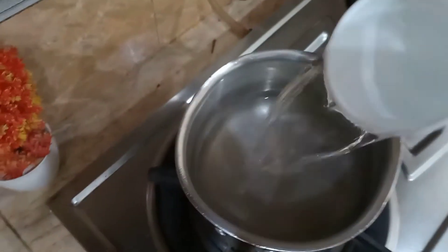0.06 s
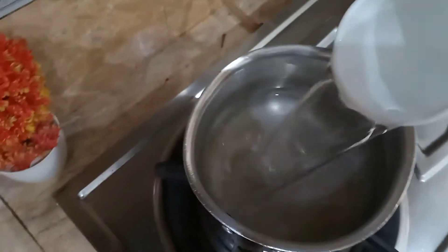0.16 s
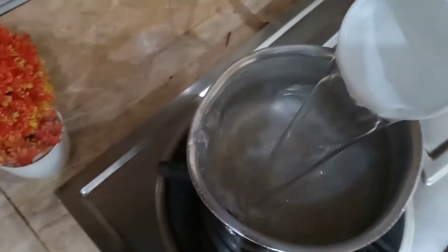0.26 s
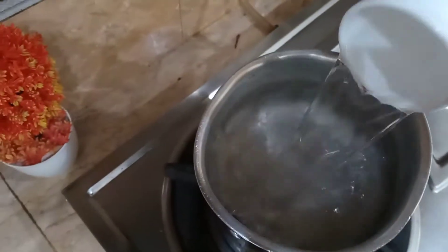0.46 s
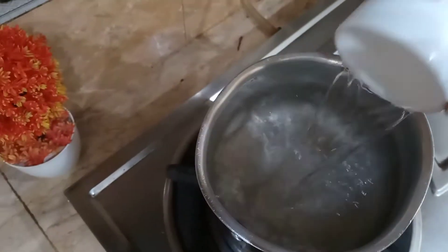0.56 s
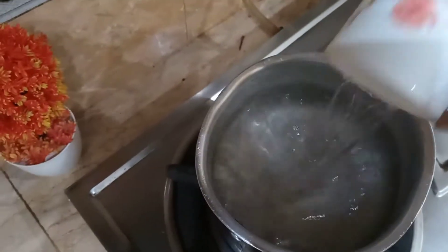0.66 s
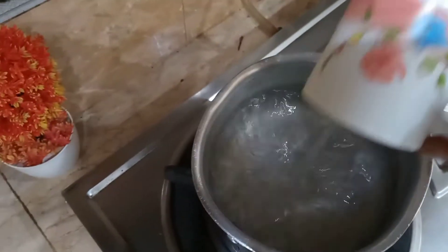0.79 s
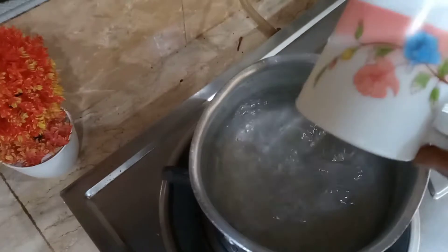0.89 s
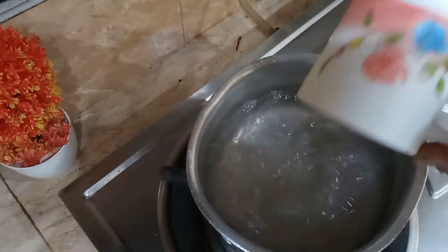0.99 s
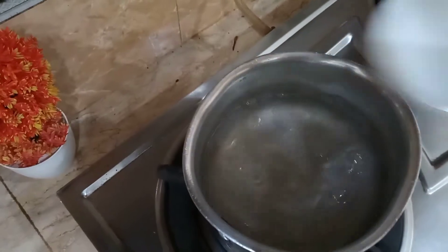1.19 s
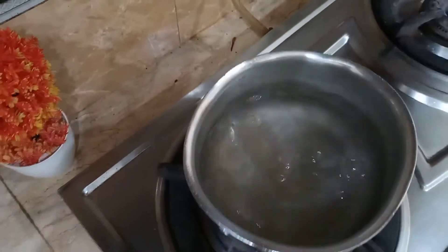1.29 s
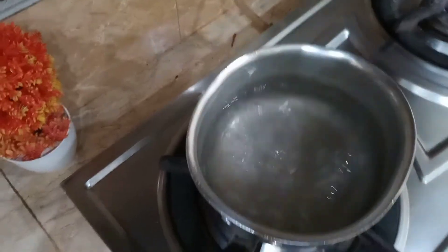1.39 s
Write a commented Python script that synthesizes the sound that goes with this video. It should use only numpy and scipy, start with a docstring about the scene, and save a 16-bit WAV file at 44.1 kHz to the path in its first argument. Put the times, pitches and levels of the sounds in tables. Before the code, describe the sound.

In a quiet kitchen, a quick, close pour of water hits a metal pan with bright spatter and gurgling bubbles. The steel hums softly underneath, and the pour trails off into light ticking drips.

```python
"""A faint low thump, then ticking drops: a cup of water is poured into a steel saucepan.
Drops strike the steel and the water, trapped air rings as bubbles large and small, and the shaken pan
hums along. The stream thins out to last drops and a fine fizz. Short echoes come off the pan's walls
and the counter, and behind it all lies the low rumble of a quiet kitchen."""
import sys
import numpy as np
from scipy import signal
from scipy.fft import rfft, irfft
from scipy.io import wavfile

SR = 44100
rng = np.random.default_rng(int(sys.argv[2]) if len(sys.argv) > 2 else 0)


def master_out(mix):
    """Clip the mix to full scale and print it as 16-bit PCM to the path in sys.argv[1]."""
    frames = np.transpose(np.atleast_2d(mix))
    ceiling = np.clip(frames, -1, 1)
    pcm = np.round(ceiling * 32767).astype(np.int16)
    wavfile.write(sys.argv[1], SR, pcm)


N = 63945

# Levels in the tables are relative: the functions add their own gains.
# The stream: t/s, then level/dB of large bubbles, gurgle, middle bubbles, small bubbles, spray, mist
STREAM_LEVELS = [(0.14, -69.5, -70, -85, -73, -83, -80), (0.208, -48, -80, -33, -41.5, -33.5, -38),
                 (0.248, -36, -51, -35.5, -32, -37, -36.5), (0.26, -31.5, -67, -36, -45, -31, -32),
                 (0.284, -36, -53, -36.5, -36, -30.5, -32.5), (0.326, -34.5, -52.5, -36, -43.5, -39.5, -43),
                 (0.602, -39.5, -56.5, -33.5, -35.5, -35, -41), (0.624, -38, -56.5, -35, -40.5, -42, -44),
                 (0.632, -35, -52.5, -26, -36.5, -38, -42), (0.66, -41, -58.5, -38, -35, -35, -37.5),
                 (0.712, -26.5, -45, -32.5, -65, -37.5, -39.5),
                 (0.742, -38, -50.5, -40.5, -43.5, -44.5, -47), (0.782, -32.5, -48, -41.5, -62, -47, -49),
                 (0.792, -44, -48, -34, -40.5, -41, -40.5), (0.818, -37.5, -44.5, -43, -59.5, -48.5, -51),
                 (0.946, -43, -57, -49.5, -58.5, -45, -49.5), (0.974, -46, -56, -52.5, -76.5, -67.5, -92.5),
                 (0.982, -49.5, -62, -59, -63, -52.5, -50), (1.014, -40.5, -58.5, -51.5, -62, -60, -54),
                 (1.034, -49, -62.5, -58, -62.5, -58.5, -62.5), (1.242, -67, -97, -73, -62.5, -62.5, -66),
                 (1.45, -100.5, -77, -94, -72.5, -61.5, -66.5)]
# Swarms of tiny rings: rate/(1/s), lowest f/Hz, highest f/Hz, ring length/cycles, size spread/dB,
# level/dB of the noise beneath the clicks, overall level/dB
GURGLE_SWARM = (306, 283.5, 463, 9, 2.5, 3, -2.5)
LARGE_SWARM = (507, 645.5, 2067.5, 15, 1.5, -2, -5.5)
MIDDLE_SWARM = (504.5, 2007, 3918, 6.5, -0.5, 0, -4.5)
SMALL_SWARM = (905.5, 3801, 6286, 25, 5, -7, -5)
SPRAY_SWARM = (1502.5, 6206, 9193, 51, 2, 1.5, -9)
MIST_SWARM = (2010.5, 9008.5, 15995, 17.5, 2.5, 5, -6)
# Loud single bubbles: t/s, level/dB, starting f/Hz, t60/s (the time to fade by 60 dB)
SINGLE_BUBBLES = [(0.253, -19, 1027, 0.047), (0.257, -18.5, 762, 0.026), (0.271, -30, 543, 0.04),
                  (0.278, -27, 540, 0.011), (0.316, -24.5, 1057, 0.053), (0.321, -20.5, 1095, 0.024),
                  (0.389, -33.5, 1680, 0.055), (0.447, -19.5, 963, 0.02), (0.452, -23.5, 1176, 0.023),
                  (0.519, -30.5, 753, 0.051), (0.555, -27, 1490, 0.036), (0.556, -34, 1538, 0.074),
                  (0.628, -29.5, 915, 0.2), (0.642, -25.5, 1560, 0.039), (0.678, -25, 980, 0.024),
                  (0.6927, -15.5, 1750, 0.016), (0.704, -19.5, 1830, 0.038), (0.728, -32.5, 1784, 0.061),
                  (0.768, -23.5, 1095, 0.033), (0.78, -23.5, 1108, 0.078), (0.791, -20, 1092, 0.029),
                  (0.842, -28.5, 1750, 0.03), (1.007, -26, 1676, 0.05), (1.077, -39.5, 1710, 0.03),
                  (0.7053, -24, 1150, 0.03), (0.78, -20, 1360, 0.03), (0.267, -25.5, 660, 0.046),
                  (0.45, -29, 666, 0.048), (0.555, -32, 790, 0.061), (0.1615, -31.5, 4400, 0.028),
                  (0.1674, -32.5, 5820, 0.017), (0.1605, -47, 8500, 0.017), (0.186, -29, 2730, 0.013),
                  (0.2048, -21.5, 3620, 0.023), (0.2172, -25.5, 3206, 0.08), (0.2404, -18, 5470, 0.0085),
                  (0.2595, -23, 3710, 0.067), (0.2674, -30, 3380, 0.036), (0.2734, -16, 3340, 0.015),
                  (0.277, -25, 3970, 0.023), (0.3093, -18.5, 4140, 0.02), (0.3154, -18, 2440, 0.01),
                  (0.3427, -19.5, 4940, 0.015), (0.3658, -20.5, 3110, 0.011), (0.392, -20.5, 3620, 0.0099),
                  (0.403, -23, 3150, 0.02), (0.4339, -26, 3680, 0.014), (0.4524, -27, 3540, 0.019),
                  (0.4903, -21, 3420, 0.021), (0.5188, -18, 3170, 0.017), (0.5686, -20, 3120, 0.027),
                  (0.5838, -28, 3360, 0.086), (0.631, -21.5, 3430, 0.019), (0.631, -13, 2590, 0.021),
                  (0.6415, -19, 3000, 0.032), (0.6628, -24, 4120, 0.022), (0.6926, -13.5, 3100, 0.015),
                  (0.7347, -26, 2590, 0.019), (0.7563, -28, 2580, 0.027), (0.7901, -25.5, 4410, 0.035),
                  (0.8394, -28, 2616, 0.044), (1.2037, -42, 3540, 0.015), (1.2085, -40.5, 4050, 0.02),
                  (1.2451, -47, 5520, 0.024), (1.343, -49, 4450, 0.014)]
# Drops striking: t/s, level/dB, extra treble level/dB, treble f/Hz, length/s
DROP_HITS = [(0.1594, -51, -9, 11100, 0.0043), (0.1654, -38.5, -13, 12700, 0.0038),
             (0.185, -35.5, -8, 9200, 0.0077), (0.208, -17, -10.5, 10600, 0.0042),
             (0.2154, -23, -33, 12000, 0.0075), (0.2264, -21, -19, 13000, 0.0022),
             (0.2625, -23.5, -4, 14000, 0.0017), (0.2895, -20.5, -11, 10000, 0.001),
             (0.299, -32, -4, 13000, 0.0014), (0.334, -28, -13, 15300, 0.0026),
             (0.355, -30.5, -7, 9500, 0.001), (0.392, -42, 0, 15200, 0.0018),
             (0.44, -31, -15, 11000, 0.002), (0.4555, -26.5, -10, 13900, 0.0034),
             (0.486, -27, -23, 9500, 0.0012), (0.494, -33.5, -5.5, 11500, 0.0011),
             (0.506, -35.5, -20, 9500, 0.002), (0.541, -39, 0.5, 15000, 0.0038),
             (0.5599, -34.5, -10.5, 12000, 0.0036), (0.629, -24.5, -7.5, 13000, 0.0009),
             (0.677, -30.5, -9.5, 12000, 0.00088), (0.703, -28, -13.5, 11000, 0.0018),
             (0.719, -34, -5.5, 14000, 0.0012), (0.808, -27, -10, 15000, 0.0012),
             (0.8392, -30, -5, 14500, 0.00091), (0.907, -33.5, -16, 10000, 0.0014),
             (0.933, -32, -20, 9500, 0.00055), (0.939, -39, -7, 9300, 0.00092),
             (0.986, -38, 2, 11500, 0.00087), (1.145, -51, 1.5, 11600, 0.00084),
             (1.1907, -28.5, -32.5, 9000, 0.00067), (1.2028, -33, -4.5, 10700, 0.001),
             (1.233, -46.5, -18, 9000, 0.0017), (1.247, -40, -24, 11000, 0.0022)]
# The pan's three tones: f/Hz, width/Hz, late climb/Hz
PAN_TONES = [(240, 11, 0), (549.7, 28.4, 50.5), (1679, 140, 2.5)]
# How strongly the water drives them: t/s, then level/dB of the low, middle and high tone
PAN_TONE_LEVELS = [(.16, -89, -76, -104), (0.204, -55, -88, -44), (0.269, -55, -34, -50),
                   (.36, -67, -51.5, -50), (.5, -57, -64, -49), (.65, -66.5, -66.5, -53),
                   (.73, -72.5, -48.5, -45), (.83, -58, -46.5, -51), (.96, -73, -54.5, -57),
                   (1.082, -70.5, -67, -60), (1.17, -100, -66.5, -65.5), (1.21, -87, -102, -66),
                   (1.365, -93, -88, -77.5), (1.385, -84, -92, -100)]
# The kitchen's steady noise: f/Hz, level/dB
ROOM_SPECTRUM = [(20, -28), (70, 3.5), (200, -4.5), (600, -12), (1500, -12), (4000, -21), (6500, -21.5),
                 (7600, -21), (16000, -22)]

BRIGHT_HZ, BRIGHT_WIDTH_HZ = 7670, 720   # a bright resonance shared by spray and drops
SPATTER_PER_S, SPATTER_FADE_S, SPATTER_DB = 240, 0.0031, 2
BUBBLE_DB, ONSET_S, RISE = -2.5, 0.00038, 0.138   # the pitch rises by this share over one t60
WOBBLE_SPEED, WOBBLE_DEPTH = 0.092, 0.44   # a bubble's level wobbles; speed is a share of its pitch
TICK_DB, TICK_TAIL_S, TICK_TAIL_DB = 7.5, 0.0084, -11.5
TREBLE_WIDTH_HZ, TREBLE_DB = 5100, 7.5
PAN_EVENNESS = 0.45   # 0 wavers like noise, 1 is nearly steady
SETTLE_S = (0.98, 1.3)   # the pan's tones climb between these times as the water settles
ECHO_T60_S, ECHO_DB, ECHO_CUT_HZ = 0.44, -11, 12600
ROOM_DB, WHINE_HZ, WHINE_WIDTH_HZ, WHINE_DB = -74, 5280, 100, -85.5
THUMP_S, THUMP_HZ, THUMP_T60_S, THUMP_DB = 0.0032, 76, 0.058, -56
WATER_LOW_CUT_HZ, TOP_CUT_HZ = 130, 16400


def stream():
    """Pouring water traps air and throws spray: six swarms, deep to high, swell and fade with the flow."""
    large, gurgle, middle, small, spray, mist = gain_curves(STREAM_LEVELS)
    fizz = swarm(*SPRAY_SWARM)
    fizz = fizz + amp(1.5) * resonance(fizz, BRIGHT_HZ, BRIGHT_WIDTH_HZ)
    bubbling = gurgle * swarm(*GURGLE_SWARM) + large * swarm(*LARGE_SWARM)
    bubbling += middle * swarm(*MIDDLE_SWARM) + small * swarm(*SMALL_SWARM)
    return bubbling + spatter() * (spray * fizz + mist * swarm(*MIST_SWARM))


def swarm(per_s, low_hz, high_hz, cycles, spread_db, noise_db, level_db):
    """Many tiny bubbles or droplets: random clicks and a bed of noise set 20 pitches ringing."""
    sizes = amp(spread_db * np.minimum(rng.exponential(1, N), 4)) * rng.choice([-1, 1], N)
    clicks = sizes * (rng.random(N) < per_s / SR)
    which_pitch = rng.integers(0, 20, N)
    kicks = rms_one(clicks) + amp(noise_db) * rng.standard_normal(N)
    out = 0
    for k, hz in enumerate(np.geomspace(low_hz, high_hz, num=20)):
        ringing = ring(kicks * (which_pitch == k), hz, t60=cycles / hz)
        out += resonance(ringing, hz, width_hz=10 * hz / cycles)   # softens the start of each ring
    return amp(level_db) * rms_one(out)


def spatter():
    """Droplets come in clumps: a gain that jumps with each clump and sinks back."""
    jumps = rng.exponential(1, N) * (rng.random(N) < SPATTER_PER_S / SR)
    clumps = signal.lfilter([1], [1, -np.exp(-1 / (SPATTER_FADE_S * SR))], jumps)
    return rms_one(1 + amp(SPATTER_DB) * clumps)


def bubbles():
    """Each pocket of trapped air rings as a fading, uneven tone that climbs a little."""
    out, t = np.zeros(N + SR), np.arange(SR // 10) / SR
    for start_s, db, hz, t60 in SINGLE_BUBBLES:
        smoothing = signal.butter(2, WOBBLE_SPEED * hz, fs=SR, output="sos")
        wobble = rms_one(signal.sosfilt(smoothing, rng.standard_normal(len(t))))
        shape = (1 - np.exp(-t / ONSET_S)) * amp(db + BUBBLE_DB - 60 * t / t60)
        tone = np.sin(2 * np.pi * hz * (t + 0.5 * RISE * t * t / t60))
        out[int(start_s * SR):][:len(t)] += shape * (1 + WOBBLE_DEPTH * wobble) * tone
    return out[:N]


def drop_ticks():
    """A drop hits steel or water: a sharp burst of noise with a bright ring and a treble of its own."""
    body, top, t = np.zeros(N + SR), np.zeros(N + SR), np.arange(SR // 20) / SR
    for start_s, db, treble_db, treble_hz, length_s in DROP_HITS:
        shape = np.exp(-(t / length_s) ** 2) + amp(TICK_TAIL_DB) * np.exp(-t / TICK_TAIL_S)
        burst = shape * rng.standard_normal(len(t))
        burst *= np.sqrt(np.sum(shape ** 2) / np.sum(burst ** 2))   # same energy whatever the noise
        treble = band(burst, treble_hz, TREBLE_WIDTH_HZ)
        body[int(start_s * SR):][:len(t)] += amp(db + TICK_DB) * burst
        top[int(start_s * SR):][:len(t)] += amp(db + treble_db + TREBLE_DB) * treble
    bright = resonance(body, BRIGHT_HZ, BRIGHT_WIDTH_HZ)
    bright = resonance(bright, BRIGHT_HZ, 2 * BRIGHT_WIDTH_HZ)
    return (bright + top)[:N]


def pan_hum():
    """The water shakes the steel; each tone is a narrow band of noise, partly evened out."""
    out, settled = 0, np.interp(np.arange(N) / SR, SETTLE_S, [0, 1])
    for gain, (hz, width_hz, climb_hz) in zip(gain_curves(PAN_TONE_LEVELS), PAN_TONES):
        hum = rms_one(band(rng.standard_normal(N), hz, width_hz))
        climb = np.exp(2j * np.pi * climb_hz * np.cumsum(settled) / SR)
        tone = signal.hilbert(hum) * climb   # slides the pitch up; abs(tone) is its loudness
        evened = tone.real / (np.abs(tone) + 0.075) ** PAN_EVENNESS
        out += gain * rms_one(evened)
    return out


def echoes(x):
    """Sound bounces off the pan's walls and the counter in a dense, fading tail."""
    t = np.arange(SR // 3) / SR
    tail = rng.standard_normal(len(t)) * amp(-60 * t / ECHO_T60_S) * (t > .002)
    tail = signal.sosfilt(signal.butter(1, ECHO_CUT_HZ, fs=SR, output="sos"), tail)
    return amp(ECHO_DB) * signal.fftconvolve(x, tail / np.sqrt(np.sum(tail ** 2)))[:N]


def kitchen():
    """Steady room noise, a faint thin whine and one soft low thump at the start."""
    click = np.zeros(N)
    click[int(THUMP_S * SR)] = amp(THUMP_DB)
    thump = ring(click, THUMP_HZ, THUMP_T60_S)
    whine = rms_one(band(rng.standard_normal(N), WHINE_HZ, WHINE_WIDTH_HZ))
    return amp(ROOM_DB) * shaped_noise(ROOM_SPECTRUM) + amp(WHINE_DB) * whine + thump


def amp(db):
    """Turns decibels into a gain to multiply by."""
    return 10 ** (np.asarray(db) / 20)


def rms_one(x):
    """Scales a signal to an average strength (rms) of 1."""
    return x / np.sqrt(np.mean(x ** 2) + 1e-20)


def gain_curves(rows):
    """A gain over time for each dB column, silent before the first row."""
    times, *columns = np.transpose(rows)
    t = np.arange(N) / SR
    return [amp(np.interp(t, times, db)) * (t > times[0]) for db in columns]


def ring(x, hz, t60):
    """Each click in x starts a fading sine wave about as tall as the click."""
    r, w = amp(-60 / (t60 * SR)), 2 * np.pi * hz / SR
    return signal.lfilter([0, np.sin(w)], [1, -2 * r * np.cos(w), r * r], x + 1e-18)


def resonance(x, hz, width_hz):
    """Lets sound near one pitch through and weakens the rest."""
    r, w = np.exp(-np.pi * width_hz / SR), 2 * np.pi * hz / SR
    return signal.lfilter([(1 - r * r) / 2, 0, (r * r - 1) / 2], [1, -2 * r * np.cos(w), r * r], x)


def band(x, hz, width_hz):
    """The same resonance twice, for steeper sides."""
    return resonance(resonance(x, hz, width_hz), hz, width_hz)


def shaped_noise(spectrum):
    """Noise whose lows and highs follow the given spectrum."""
    hz, db = np.transpose(spectrum)
    log_hz = np.log(np.fft.rfftfreq(N, 1 / SR) + 1)
    gain = amp(np.interp(log_hz, np.log(hz), db))
    return rms_one(irfft(rfft(rng.standard_normal(N)) * gain, N))


def scene():
    """Water and pan, their echoes and the kitchen, in one channel."""
    water = stream() + pan_hum() + bubbles() + drop_ticks()
    water = signal.sosfilt(signal.butter(4, WATER_LOW_CUT_HZ, "high", fs=SR, output="sos"), water)
    return (water + echoes(water) + kitchen())[None]


def record(dry):
    """Cuts away the very highest treble."""
    return signal.sosfilt(signal.cheby2(16, 70, TOP_CUT_HZ, fs=SR, output="sos"), dry)


dry = scene()
out = record(dry)
master_out(out)
```